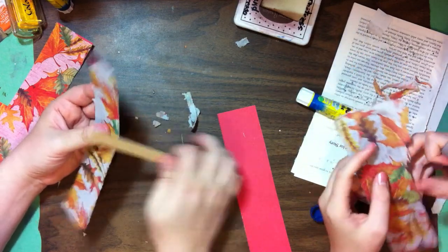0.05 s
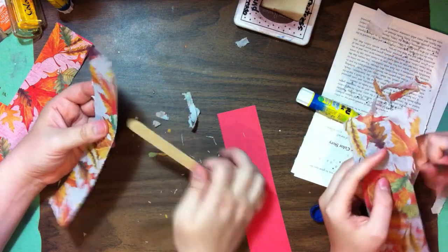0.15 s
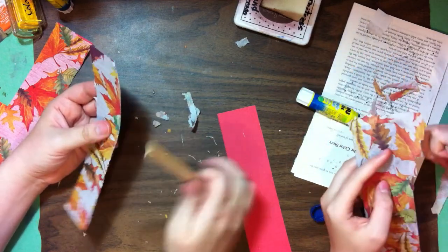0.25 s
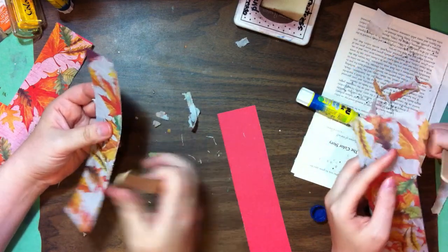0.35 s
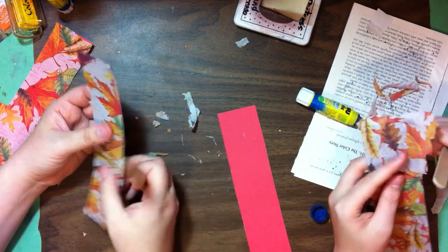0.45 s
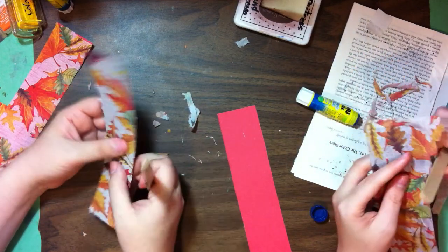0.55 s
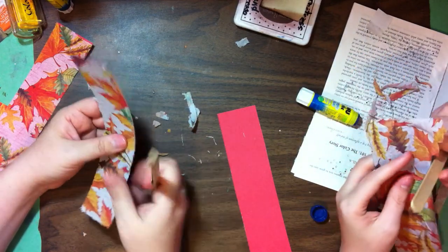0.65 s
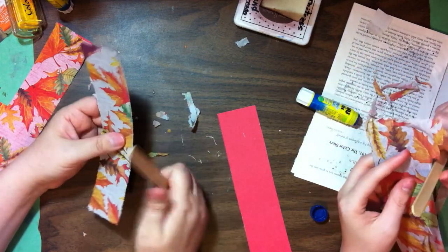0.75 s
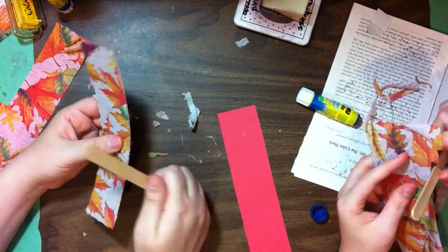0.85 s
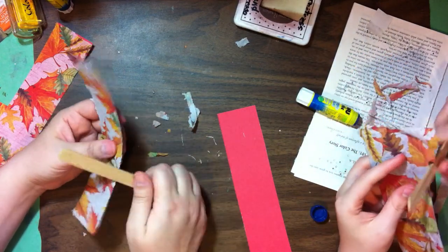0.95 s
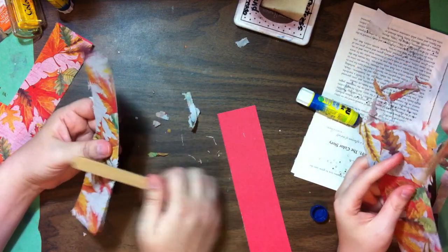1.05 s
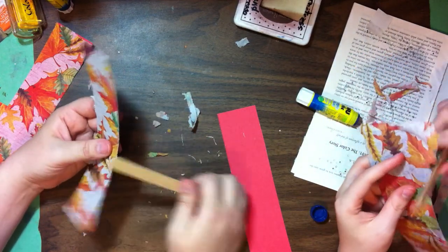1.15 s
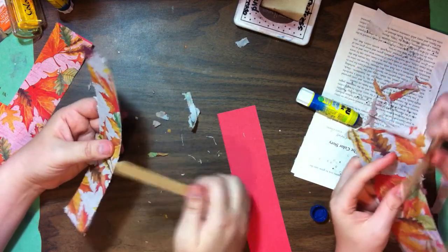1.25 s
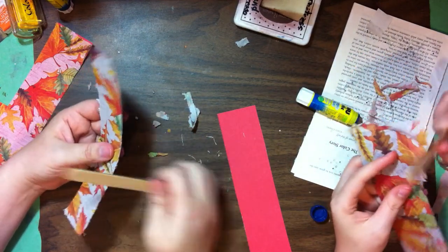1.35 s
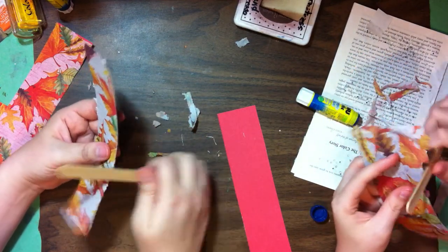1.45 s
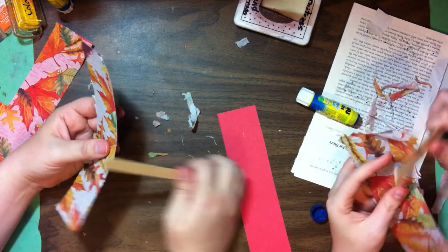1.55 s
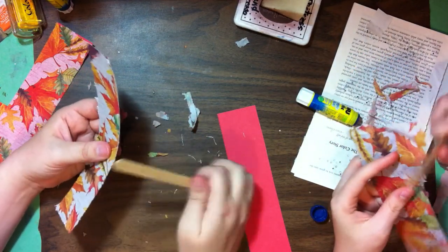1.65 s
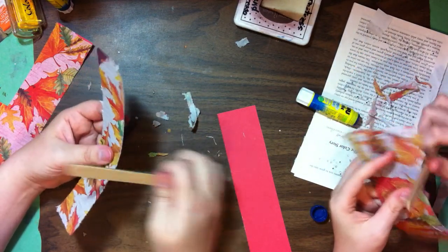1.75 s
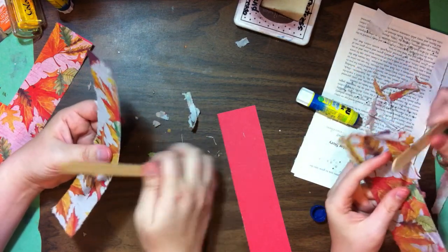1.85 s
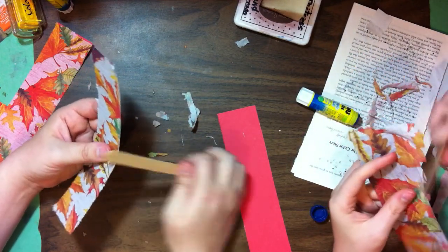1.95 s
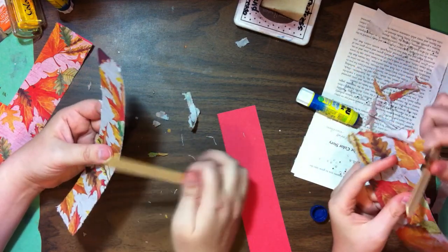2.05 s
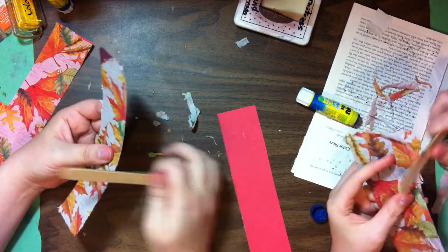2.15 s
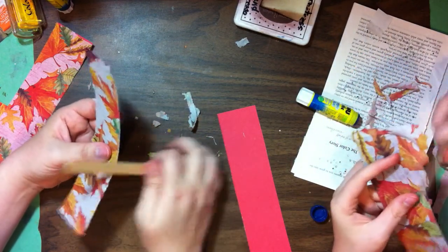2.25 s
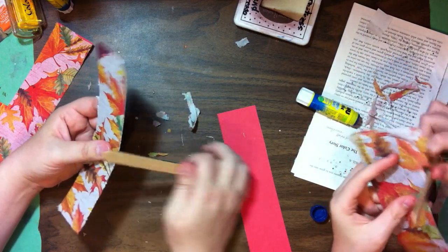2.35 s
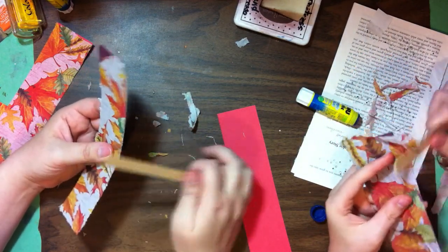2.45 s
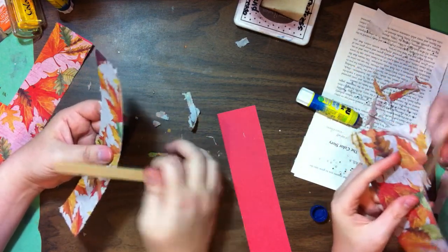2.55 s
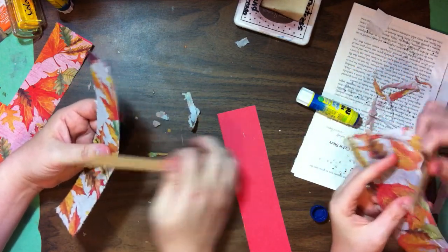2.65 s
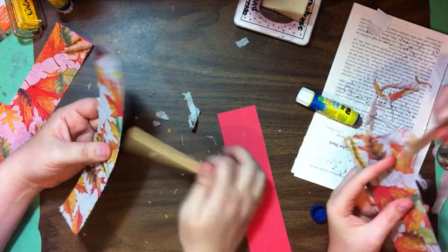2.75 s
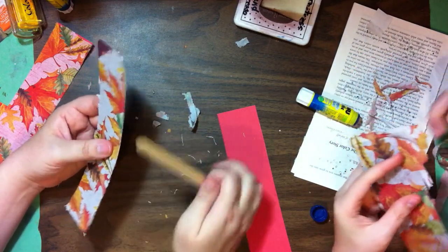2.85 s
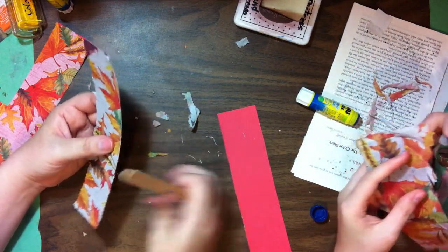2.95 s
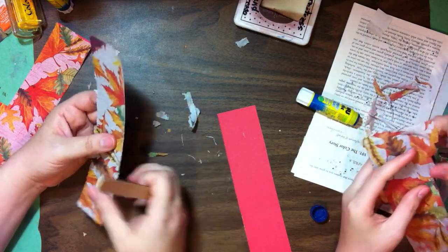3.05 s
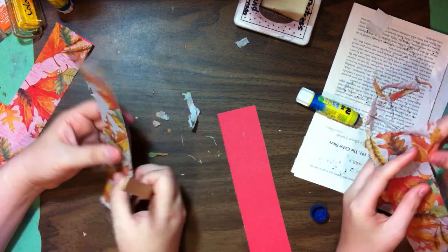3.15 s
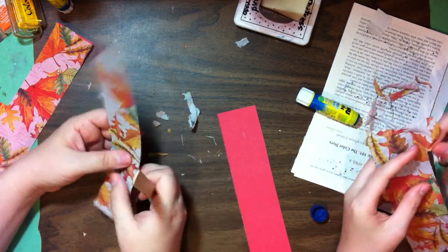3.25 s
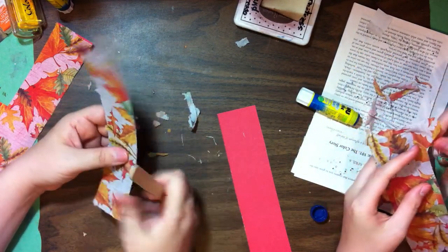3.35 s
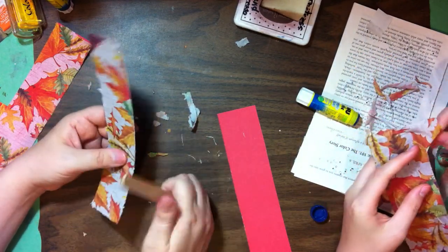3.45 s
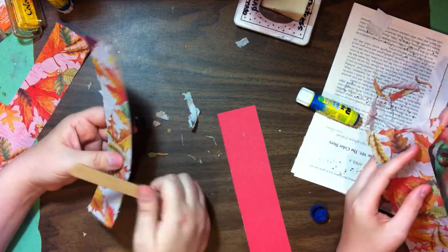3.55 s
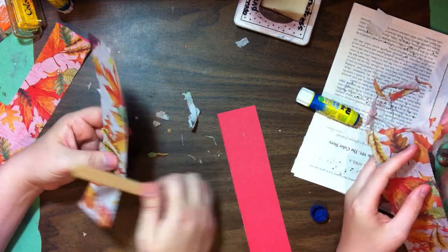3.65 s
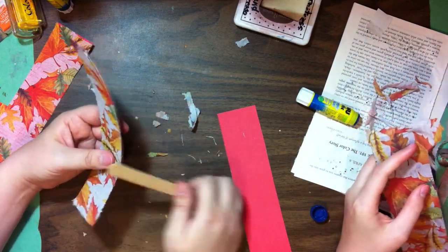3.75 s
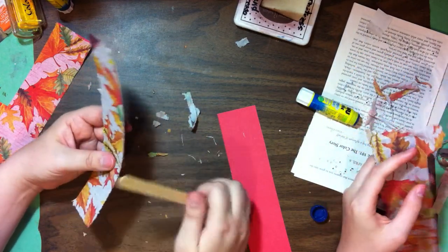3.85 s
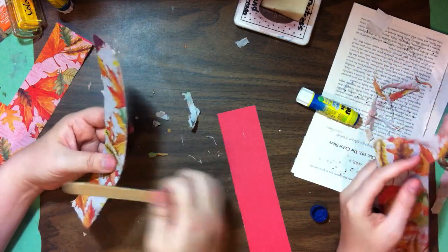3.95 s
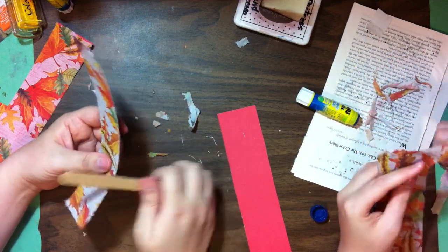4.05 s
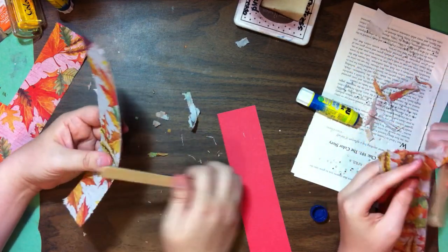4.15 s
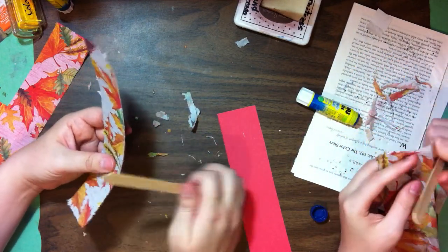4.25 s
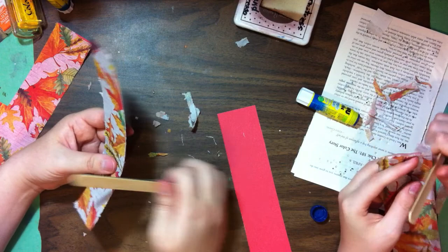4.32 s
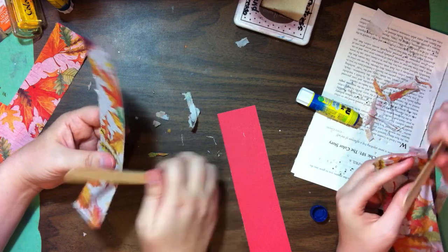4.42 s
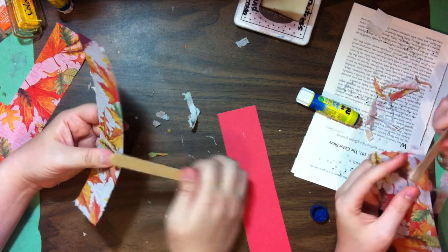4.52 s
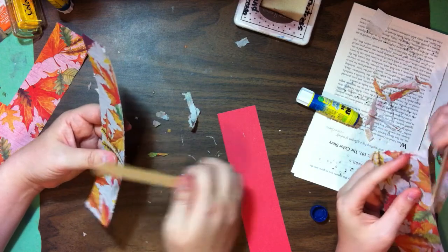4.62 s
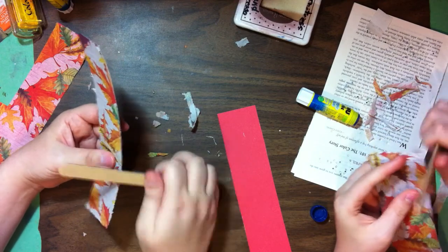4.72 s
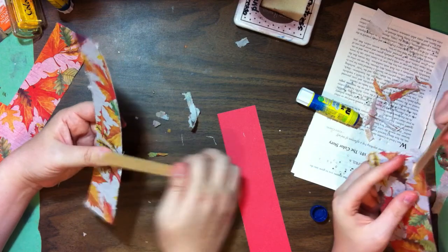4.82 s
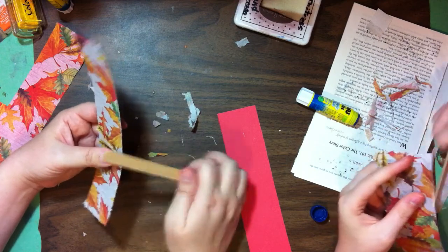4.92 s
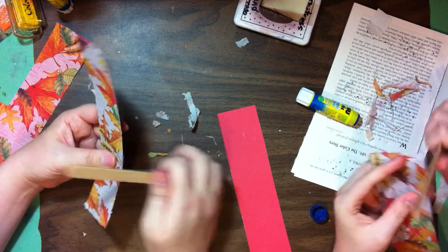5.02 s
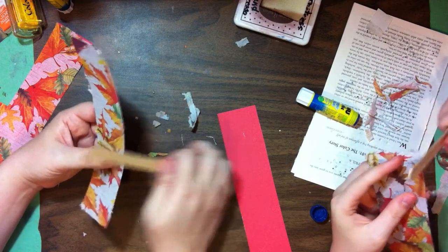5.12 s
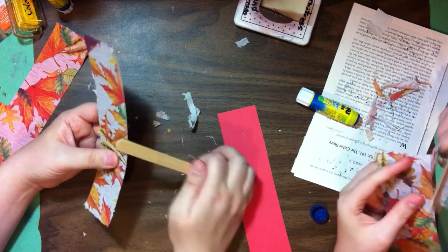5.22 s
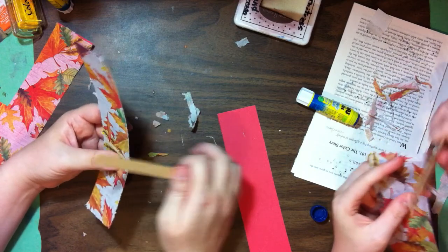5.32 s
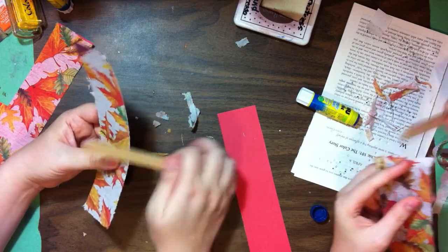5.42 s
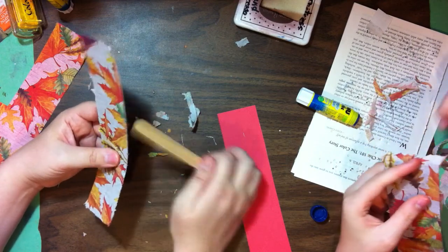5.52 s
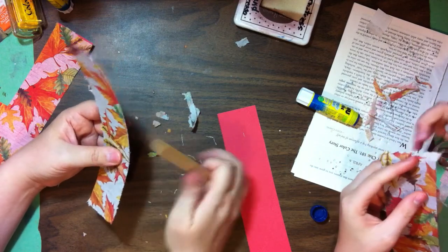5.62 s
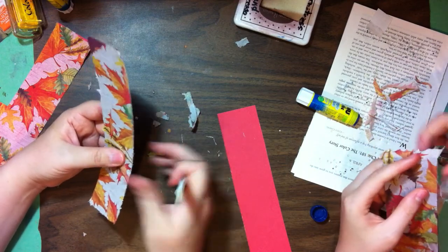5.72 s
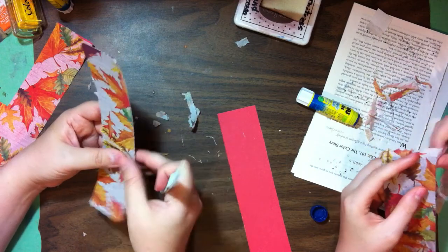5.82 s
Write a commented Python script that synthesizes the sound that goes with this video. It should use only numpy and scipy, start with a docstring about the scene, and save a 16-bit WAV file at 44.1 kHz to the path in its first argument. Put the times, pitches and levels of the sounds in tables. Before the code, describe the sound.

Close-up in a small, quiet room, a nail file scrapes the edge of a paper-covered card strip. After a faint stroke and soft handling, quick uneven rasps come in a run, with little knocks as the file meets the card. A pause of about a second holds only faint rustles and taps, then a second, slightly slower run of strokes continues to the end.

```python
"""A nail file rasps in quick strokes along the edge of a paper-covered card held over a desk.
Clumped grains of noise, for grit tearing paper fibres, hiss and ring resonances of the card and file.
Taps are filtered noise bursts: a knock on the card and a scuff of the paper. Fingers rustle on it faintly.
A small, quiet room adds a few early echoes, a short tail and steady air noise."""
import sys
import numpy as np
from scipy import signal
from scipy.fft import rfft, irfft
from scipy.io import wavfile

SR = 44100
rng = np.random.default_rng(int(sys.argv[2]) if len(sys.argv) > 2 else 0)


def transcribe(u):
    """Save the signal u as a 16-bit wav file named by the first command-line argument.

    u: samples, shape (n,) or (channels, n), limited to [-1, 1]; the rate is SR.
    q: integer samples, one column per channel.
    """
    v = np.clip(np.atleast_2d(u).T, -1, 1)
    q = np.round(v * 32767).astype(np.int16)
    wavfile.write(sys.argv[1], SR, q)


N = 259308
T = np.arange(N) / SR
FILTER_HZ = np.fft.rfftfreq(4096, 1 / SR)

# Spectrum of tearing fibres. Each row: frequency in Hz, relative level in dB per Hz.
TEARING = [(60, -31.5), (200, -23), (350, -18.5), (560, -6.5), (790, -3), (1100, -7.5), (1900, 2.5),
           (2500, 2), (3900, 5), (6500, 2), (9000, 0), (11600, 4), (14000, 1.5), (16000, -9.5)]


def amp(db):
    """Decibels to gain."""
    return 10 ** (np.asarray(db) / 20)


def evened(x):
    """Scales to rms 1."""
    return x / np.sqrt(np.mean(x ** 2) + 1e-20)


def unit_energy(x):
    """Scales to energy 1."""
    return x / np.linalg.norm(x)


def read(points, hz):
    """Interpolates a table linearly over log frequency."""
    f, value = np.transpose(points)
    return np.interp(np.log(hz + 1e-6), np.log(f), value)


def ringing(db):
    """Minimum-phase impulse response, of energy 1, with this spectrum."""
    floored_db = np.maximum(db, db.max() - 100)
    log_gain = np.log(amp(floored_db))
    circle = np.concatenate([log_gain, log_gain[-2:0:-1]])  # both halves of the spectrum
    # the Hilbert transform of log gain gives the phase
    response = np.fft.ifft(np.exp(np.conj(signal.hilbert(circle)))).real
    return unit_energy(response)


def through(x, response):
    """Convolves a sound with an impulse response."""
    return signal.oaconvolve(x, response)[:N]


def shaped_noise(gain):
    """Gaussian noise of rms 1 with this gain over frequency."""
    return evened(irfft(rfft(rng.standard_normal(N)) * gain, N))


def wander(hz):
    """Random motion of rms 1, rolled off steeply above hz."""
    return shaped_noise(1 / (1 + (np.fft.rfftfreq(N, 1 / SR) / hz) ** 4))


def add(mix, start_s, sound):
    """Mixes a sound in at start_s."""
    part = mix[round(start_s * SR):][:len(sound)]
    part += sound[:len(part)]


def grit(catches_per_s, spread_db):
    """Single grains catch and let go at random, a few of them hard; rms 1."""
    size = amp(spread_db * np.minimum(rng.exponential(1, N), 4))
    sign = rng.choice([-1, 1], N)
    caught = rng.random(N) < catches_per_s / SR
    return evened(size * sign * caught)


def resonate(x, hz, width_hz):
    """A double-pole resonance that follows the curve hz; steady noise roughly keeps its level."""
    turn = np.exp(2j * np.pi * np.cumsum(hz * np.ones(N)) / SR)
    r = np.exp(-np.pi * width_hz / SR)
    poles = [1, -2 * r, r * r]
    size = np.linalg.norm(signal.lfilter([1], poles, signal.unit_impulse(len(FILTER_HZ))))
    lowpassed = signal.lfilter([1], poles, x / turn)  # hz shifted down to 0
    return np.sqrt(2) * (turn * lowpassed).real / size


def strokes():
    """Force of the file over time, and ring levels and pitches blended by each stroke's share of it."""
    # Each row: start, attack, hold and release in seconds, force level in dB, relative card flex and
    # card ring levels in dB, ring swell in dB per s, relative file low and file high levels in dB,
    # file low and file high pitches in Hz at mid-hold.
    stroke_rows = [(.119, 0.027, 0.054, 0.062, -43, -12, -10, -200, 3.5, -0.5, 2890, 5230),
                   (1.006, 0.14, 0.092, 0.06, -39, -23.5, -3.5, 14, -4, -8.5, 2800, 4700),
                   (1.324, 0.021, 0.042, 0.075, -46, -8, -5.5, 5, -1.5, -13, 2690, 4770),
                   (1.536, 0.029, 0.047, 0.14, -37, -14.5, -3, -1, 1, -4.5, 2630, 4900),
                   (1.878, 0.025, 0.052, .025, -44.5, -8.5, -8, -60.5, -11, -10, 3220, 5130),
                   (1.945, 0.036, 0.035, 0.097, -33, -24.5, -13.5, -49.5, -5.5, 10, 3700, 5300),
                   (2.145, 0.038, 0.11, 0.056, -53.5, -6.5, -10.5, 70, -4.5, -10, 2410, 4480),
                   (2.323, 0.035, 0.0066, 0.18, -38, -19, -9, 40, 1.5, 5.5, 2980, 5020),
                   (2.48, 0.029, 0.03, 0.1, -44.5, -9, -11.5, 6, -4, -9, 3580, 4470),
                   (2.695, 0.061, 0.03, 0.096, -34.5, -16, -13, -31, -2, 7, 3780, 5200),
                   (3.729, 0.05, 0.03, .105, -32.5, -38, -12.5, -100, 0.5, 2, 2970, 5340),
                   (4.132, 0.047, 0.03, 0.15, -40, -18, -3, -140, -0.5, 1.5, 2860, 5370),
                   (4.485, 0.072, 0.036, 0.061, -32.5, -22, -13.5, -130, -5.5, 1.5, 3220, 5630),
                   (4.834, 0.01, 0.073, 0.099, -39.5, -14.5, -7, -29, -2.5, -7, 2890, 4620),
                   (5.13, 0.023, 0.1, 0.1, -42.5, -11, -6, 43, -2, -8.5, 2770, 4970),
                   (5.416, 0.026, 0.17, 0.034, -42, -11, -4.5, 81, -5.5, -21, 2810, 5660)]
    attack_power, release_power = 1.36, 3.7  # of the quarter sines of the hand's motion
    flex_swell_db_per_s = 71.5  # the card gives way under the file
    glide_oct_per_s = 0.46  # the free end of the file shortens
    forces, grips = [], []
    for (start, attack, hold, release, db, flex_db, card_db, swell,
         low_db, high_db, low_hz, high_hz) in stroke_rows:
        length = attack + hold + release
        t = np.clip(T - start, 0, length)
        rise = np.sin(np.pi / 2 * np.clip(t / attack, 0, 1))
        fall = np.sin(np.pi / 2 * np.clip((length - t) / release, 0, 1))
        forces.append(amp(db) * rise ** attack_power * fall ** release_power)
        past_middle = t - attack - hold / 2
        glide = 2 ** (glide_oct_per_s * past_middle)
        grips.append((flex_db + flex_swell_db_per_s * past_middle, card_db + swell * past_middle,
                      low_db, high_db, low_hz * glide, high_hz * glide))
    force = sum(forces)
    # the small floor gives equal shares between strokes
    shares = [(part + 1e-12) / (force + len(forces) * 1e-12) for part in forces]
    blended = [sum(share * value for share, value in zip(shares, column)) for column in zip(*grips)]
    return force, blended


def rasp(slip_db=1.23, slip_hz=300, drag_db=0.86, drag_hz=50, scrape_db=1.5, ring_db=-3.0,
         rock=0.029, rock_hz=25, radiate_hz=330, shift_db=2.1, shift_hz=22):
    """The file sticks and slips, so that catches come in clumps; they hiss and ring card and file."""
    # Single-pole widths in Hz of card flex, card ring, file low, file high.
    flex_width, card_width, low_width, high_width = [281, 253, 637, 1450]
    # Second card mode: multiple of the ring pitch, level over the ring in dB.
    upper, upper_db = (1.335, -4.5)
    flex_hz, rest_card_hz = 607, 982
    stiffen_oct = 4.5  # octaves per unit force: pressing hard stiffens the card

    push, (flex_db, card_db, low_db, high_db, low_hz, high_hz) = strokes()
    force = push * amp(slip_db * wander(slip_hz) + drag_db * wander(drag_hz))
    scrape = through(force * grit(catches_per_s=14000, spread_db=0.5), ringing(read(TEARING, FILTER_HZ)))

    detune = 1 + rock * wander(rock_hz)  # the file rocks on the edge
    card_hz = rest_card_hz * 2 ** (stiffen_oct * push) * detune
    modes = [(flex_hz, flex_width, flex_db),
             (card_hz, card_width, card_db),
             (upper * card_hz, card_width, card_db + upper_db),
             (low_hz * detune, low_width, low_db),
             (high_hz * detune, high_width, high_db)]
    rings = np.zeros(N)
    for hz, width_hz, free_db in modes:
        catches = force * grit(catches_per_s=5000, spread_db=4.0)
        contact_db = shift_db * wander(shift_hz)  # the moving contact favours one mode, then another
        rings += resonate(catches * amp(free_db + contact_db), hz, width_hz)
    # a narrow strip of card radiates almost no bass
    rings = signal.sosfilt(signal.butter(2, radiate_hz, "highpass", fs=SR, output="sos"), rings)
    return amp(scrape_db) * scrape + amp(ring_db) * rings


def taps(contact_s=0.004, chatter_db=-2, chatter_t60_s=0.077):
    """File or finger meets the card: a knock that chatters briefly, and grains that scuff the paper."""
    # Each row: start in seconds, level in dB before the contact gain, knock pitch in Hz,
    # scuff over knock in dB, scuff t60 in seconds.
    tap_rows = [(0.087, -53, 960, -1, 0.11), (.571, -56, 1090, -4, .04), (0.709, -51, 310, -8, 0.067),
                (0.928, -60, 1950, 20, 0.035), (1.004, -61.5, 1500, 10.5, 0.022),
                (1.277, -48, 610, -15, .02), (1.385, -43, 710, -16, .03), (1.502, -50.5, 1290, -2.5, .03),
                (1.546, -38.5, 1110, -2, 0.033), (1.823, -50, 1052, -4.5, 0.025),
                (2.139, -47, 1163, -10, .02), (2.262, -46, 510, -14, .04), (2.671, -51.5, 1110, -5, 0.025),
                (3.213, -55.5, 528, -1.5, 0.061), (3.316, -62, 600, 0, .03), (3.369, -59, 900, 5, 0.023),
                (3.685, -65, 1440, 8.5, 0.049), (4.119, -50, 1094, -4.5, 0.031),
                (4.141, -45, 1090, 1, 0.015), (4.423, -44.5, 970, 0.5, 0.11),
                (4.769, -46, 1010, -12.5, 0.026), (5.073, -43.5, 1014, -21, 0.03),
                (5.3603, -39.5, 1210, -22, 0.017)]
    # Each row: multiple of the knock pitch, relative level in dB per Hz.
    knock_spectrum = [(.08, -20.5), (.25, -6), (.5, 2), (.75, 0), (1, 7.5), (1.35, -4.5), (2, -2.5),
                      (3, -16.5), (5, -28), (12, -17)]
    out = np.zeros(N)
    t = T[:2 * len(FILTER_HZ)]
    contact_gain = np.sqrt(contact_s * SR)
    for start, db, hz, scuff_db, scuff_t60_s in tap_rows:
        decays = amp(-60 * t / np.array([[chatter_t60_s], [scuff_t60_s]]))
        chatter, crunch = rng.standard_normal((2, len(t))) * decays
        blow = signal.unit_impulse(len(t)) + amp(chatter_db) * unit_energy(chatter)
        knock = signal.fftconvolve(unit_energy(blow), ringing(read(knock_spectrum, FILTER_HZ / hz)))
        scuff = signal.fftconvolve(unit_energy(crunch), ringing(read(TEARING, FILTER_HZ)))
        add(out, start, amp(db) * contact_gain * (knock + amp(scuff_db) * scuff))
    return out


def rubs(uneven_db=1.5, uneven_hz=35, pivot_hz=3000):
    """Fingers slide on the paper as the card is turned: faint, uneven swells of rustle, dull or bright."""
    # Each row: start and length in seconds, level in dB, tilt above the pivot in dB per octave.
    rub_rows = [(0.53, 0.25, -63.5, -0.5), (0.704, 0.28, -61, -5), (0.884, 0.078, -53, 0.5),
                (3.01, 0.063, -59, 10), (3.17, .29, -59.5, -1), (3.448, 0.11, -67.5, -3),
                (4.452, 0.051, -53, -3.5)]
    # Skin on paper. Each row: frequency in Hz, relative level in dB per Hz.
    rustle_spectrum = [(200, -21), (900, -7), (2300, -1.5), (4000, -5.5), (8000, -4), (12000, -1.5),
                       (16000, -6)]
    catches = amp(uneven_db * wander(uneven_hz)) * grit(catches_per_s=3600, spread_db=2)
    out = np.zeros(N)
    octaves_above = np.maximum(np.log2((FILTER_HZ + 1) / pivot_hz), 0)
    for start, length, db, tilt in rub_rows:
        swell = np.sin(np.pi * T[T < length] / length)
        slide = amp(db) * swell * catches[round(start * SR):][:len(swell)]
        colour_db = read(rustle_spectrum, FILTER_HZ) + tilt * octaves_above
        add(out, start, signal.fftconvolve(slide, ringing(colour_db)))
    return out


def room(x, tail_db=-7, build_s=0.002):
    """Direct sound, first echoes, and a short diffuse tail that decays at its own rate in each band."""
    # Each row: frequency in Hz, t60 in seconds.
    decay_rows = [(300, 0.26), (1000, 0.21), (4000, 0.22), (8000, 0.25), (15000, 0.22)]
    # The desk and things on it. Each row: delay in seconds, gain.
    echo_rows = [(.0019, 0.14), (.0054, 0.18), (0.0117, .2), (0.0235, 0.14)]
    hz, t, bands = signal.stft(rng.standard_normal(SR // 2), SR, nperseg=256)
    decay = amp(-60 * t / read(decay_rows, hz)[:, None])
    tail = signal.istft(bands * decay, SR, nperseg=256)[1]
    tail = tail * (1 - np.exp(-T[:len(tail)] / build_s))
    response = amp(tail_db) * unit_energy(tail)
    response[0] += 1
    for delay, gain in echo_rows:
        response[round(delay * SR)] += gain
    return through(x, response)


def air(level_db=-63.5):
    """Still air of the room: faint, steady shaped noise."""
    # Each row: frequency in Hz, relative level in dB per Hz.
    air_spectrum = [(15, -55), (25, -31.5), (70, -20), (82, -11), (149, -5.5), (416, -5.5), (988, -5.5),
                    (1330, -5.5), (1480, -8), (1740, -7.5), (2050, -13.5), (2480, -13.5), (9070, -20),
                    (11300, -16.5), (16000, -20)]
    return amp(level_db) * shaped_noise(amp(read(air_spectrum, np.fft.rfftfreq(N, 1 / SR))))


def scene():
    """Filing, taps and handling in the room, over its quiet air."""
    return (room(rasp() + taps() + rubs()) + air())[None]


def record(dry, edge_hz=16100):
    """The recorder's band limit: a linear-phase lowpass."""
    lowpass = signal.firwin(511, edge_hz, window=("kaiser", 9), fs=SR)
    return signal.oaconvolve(dry, lowpass[None], "same")


dry = scene()
out = record(dry)
transcribe(out)
```